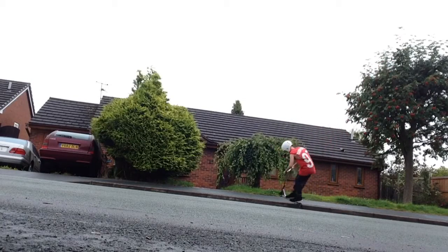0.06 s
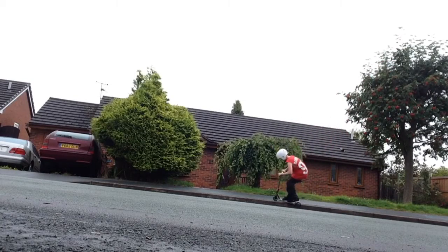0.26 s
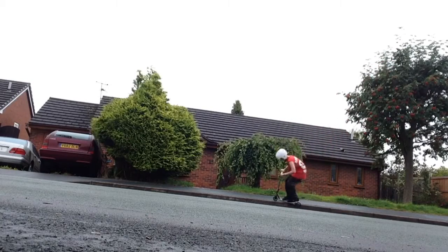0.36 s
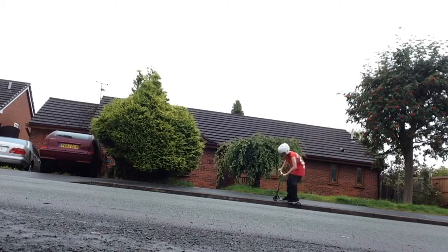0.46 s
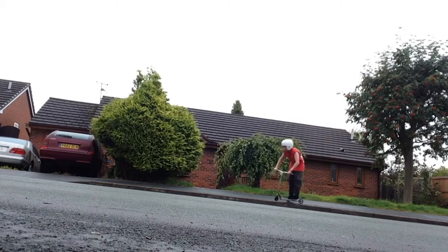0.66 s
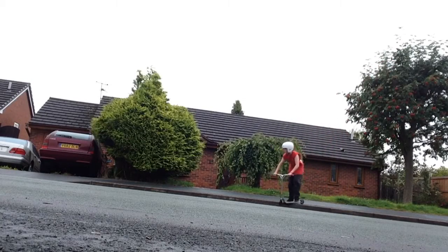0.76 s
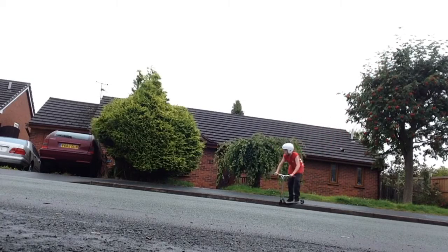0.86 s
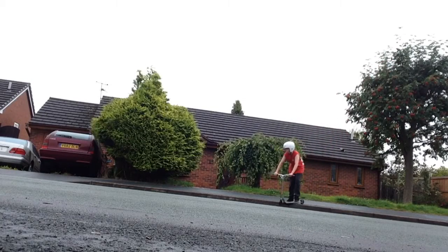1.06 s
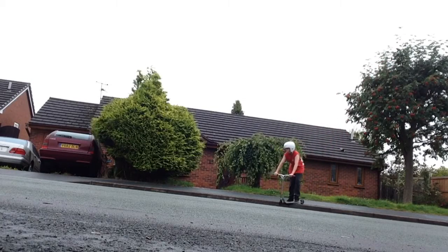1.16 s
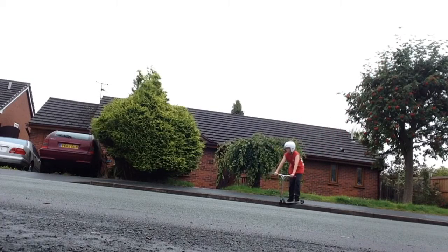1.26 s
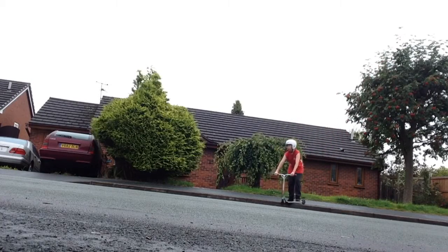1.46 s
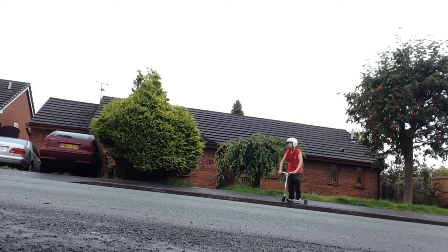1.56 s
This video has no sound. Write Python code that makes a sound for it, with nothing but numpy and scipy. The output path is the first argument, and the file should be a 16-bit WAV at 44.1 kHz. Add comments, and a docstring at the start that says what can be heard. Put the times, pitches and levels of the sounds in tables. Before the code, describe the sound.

Stunt scooter landing on a quiet street: two hard rattly clacks, brief gritty rolling, low distant rumble

```python
"""Two loud clacks among smaller knocks of a small metal stunt scooter on a quiet street, over gritty rolling.
Each knock is a short chatter of contacts that rings the frame, plus a decaying low thud of the deck.
House fronts return a short tail of sparse reflections; the handlebar tube rings on faintly.
Wheel roll and scuff are grit ticks and noise, coloured and levelled over time.
Underneath is the low rumble of the neighbourhood: dark noise with drifting patches."""
import sys
import numpy as np
from scipy import signal
from scipy.fft import rfft, irfft
from scipy.io import wavfile
from scipy.ndimage import uniform_filter1d

SR = 44100
rng = np.random.default_rng(int(sys.argv[2]) if len(sys.argv) > 2 else 0)


def volts_from_decibels(level):
    """Turn decibel levels (scalar or array-like) into linear amplitude factors."""
    exponent = np.asarray(level, float) / 20
    return 10 ** exponent


def waveform_to_disk(signal):
    """Save audio, clipped to [-1, 1], as 16-bit WAV at the path in sys.argv[1]."""
    frames = np.transpose(np.atleast_2d(signal))
    scaled = np.clip(frames, -1, 1) * 32767
    samples = np.round(scaled).astype(np.int16)
    wavfile.write(sys.argv[1], SR, samples)


N = 70560


def evened(x):
    """Scales to rms 1."""
    return x / np.sqrt(np.mean(x ** 2) + 1e-20)


def read(points, hz):
    """Reads a table along log frequency."""
    f, value = np.transpose(points)
    return np.interp(np.log(hz + 1), np.log(f + 1), value)


def add(mix, start_s, sound):
    """Mixes a sound in at start_s."""
    part = mix[round(start_s * SR):][:len(sound)]
    part += sound[:len(part)]


def rumble():
    """Distant traffic and air: dark noise whose spectrum drifts in patches of time and frequency."""
    # spectrum of the rumble: (frequency [Hz], relative density [dB per Hz])
    rumble_colour = [(15, -18), (25, -38), (54, -2), (264, -5), (326, -11), (472, -9.5), (892, -15.5),
                     (1230, -17), (2310, -29.5), (2500, -34), (14000, -67.5)]
    level_db, patchy_db = -45.5, 1.0
    frames, hz = N // 256 + 5, np.fft.rfftfreq(1024, 1 / SR)
    real, imag, patches = rng.standard_normal((frames, 513, 3)).T
    patches = uniform_filter1d(patches, 8, axis=0)  # over bins
    patches = evened(uniform_filter1d(patches, 10, axis=1))  # over frames
    gain_db = read(rumble_colour, hz)[:, None] + patchy_db * patches
    spectra = (real + 1j * imag) * volts_from_decibels(gain_db)
    noise = signal.istft(spectra, nperseg=1024, noverlap=768)[1][:N]
    return volts_from_decibels(level_db) * evened(noise)


def gritty(colour, curve):
    """Hard wheels tick over the grit of the tarmac: random ticks of uneven size in steady noise."""
    ticks_per_s, spread_db, noise_rms = 870, 4, 1.8
    ticks = rng.random(N) < ticks_per_s / SR
    size = volts_from_decibels(spread_db * np.minimum(rng.exponential(1, N), 4))
    grit = evened(ticks * size * rng.choice([-1., 1.], N))
    grit = grit + noise_rms * rng.standard_normal(N)
    gain = volts_from_decibels(read(colour, np.fft.rfftfreq(N, 1 / SR)))
    coloured = evened(irfft(rfft(grit) * gain, N))
    return coloured * volts_from_decibels(np.interp(np.arange(N) / SR, *np.transpose(curve)))


def roll():
    """Rolling wheels: grit noise strongest in the middle band."""
    # rolling loudness: (time [s], rms level [dB])
    roll_curve = [(0, -54), (.07, -57), (.18, -68), (.33, -42.5), (.45, -49.5), (.57, -55.5), (0.701, -58),
                  (0.801, -70), (1.0, -57), (1.15, -65), (1.35, -106), (1.6, -59.5)]
    # rolling spectrum: (frequency [Hz], relative density [dB per Hz])
    roll_colour = [(200, -16.5), (500, -10), (1200, 1), (2500, 1), (3700, -9.5), (5300, -13.5), (7000, -19),
                   (12000, -39.5), (16000, -34)]
    return gritty(roll_colour, roll_curve)


def scuff():
    """Sliding wheel: gritty hiss in the treble."""
    # sliding loudness: (time [s], rms level [dB])
    scuff_curve = [(0, -64), (.035, -56.5), (.06, -69), (.09, -59.5), (.15, -50), (.185, -70), (.21, -62),
                   (.23, -42), (.26, -40), (.32, -46), (.45, -72), (.55, -68.5), (.66, -73), (.75, -80),
                   (.85, -78), (.868, -51), (.93, -61.5), (1.02, -77.5), (1.55, -85.5), (1.6, -77.5)]
    # sliding spectrum: (frequency [Hz], relative density [dB per Hz])
    scuff_colour = [(3000, -14), (5000, 6), (7000, 11), (9500, 7.5), (13000, -9), (16000, -10)]
    return gritty(scuff_colour, scuff_curve)


def street(x):
    """Sparse reflections dying band by band plus a faint far tail; successive instants take different paths."""
    # decay between the house fronts: (frequency [Hz], t60 [s])
    street_t60 = [(200, 0.34), (700, 0.27), (2000, 0.25), (6000, 0.28), (14000, 0.25)]
    level_db, far_t60_s, far_db, path_change_s = -12, 0.39, -22.5, .006
    out, turn = np.zeros(N), np.pi * np.arange(N) / SR / path_change_s
    slots = np.arange(200, SR - 20, 16)  # one reflection per 16 samples
    for path in range(3):
        taps = np.zeros(SR)
        taps[slots + rng.integers(0, 16, len(slots))] = rng.choice([-1., 1.], len(slots))
        hz, t, spectra = signal.stft(taps, SR, nperseg=256)
        near = volts_from_decibels(-60 * t / read(street_t60, hz)[:, None])
        far = volts_from_decibels(far_db - 60 * t / far_t60_s)
        tail = signal.istft(spectra * (near + far), SR, nperseg=256)[1]
        share = np.sqrt(2 / 3) * np.cos(turn + path * np.pi / 3)  # squares of the three sum to 1
        out += signal.fftconvolve(x * share, tail / np.linalg.norm(tail))[:N]
    return volts_from_decibels(level_db) * out


def bar(x):
    """Every knock leaves the handlebar tube ringing faintly: one long decaying mode."""
    hz, level_db, t60_s = 1690, -37.5, 0.59
    t = np.arange(SR // 2) / SR
    ring = volts_from_decibels(-60 * t / t60_s) * np.sin(2 * np.pi * hz * t)
    return volts_from_decibels(level_db) * signal.fftconvolve(x, ring / np.linalg.norm(ring))[:N]


def contact_chatter(length_s, hit, size, sign):
    """A burst of uneven contacts of either sign that swells and fades over its length."""
    contacts_per_s, spread_db, rise_lengths, fade_db = 7000, 6, 0.54, -7
    u = np.arange(len(hit)) / SR / max(length_s, 3e-4)  # time in chatter lengths
    force = volts_from_decibels(-spread_db * np.log(size + 0.057)) * np.sign(sign - .5)
    contacts = (hit < contacts_per_s / SR) * force
    contacts[0] = 1
    return contacts * np.minimum((u + 0.033) / rise_lengths, 1) * volts_from_decibels(fade_db * u ** 2)


def frame_ring(t, nudges):
    """Decaying modes of frame, bars and wheels, slightly detuned by each knock, plus a sharp crack."""
    # modes: (frequency [Hz], level [dB], t60 [s] before the caps below)
    frame_modes = [(800, -2.5, 0.018), (1158, -21.5, 0.072), (1500, -6, 0.016), (1720, 2, 0.013),
                   (1870, -7.5, 0.06), (2178, 7.5, 0.016), (2640, 6, 0.015), (3037, 6, 0.011),
                   (3596, 9.5, 0.006), (4570, 9, 0.0033), (6220, 8.5, 0.0033), (7080, 12, 0.0033),
                   (9210, -10, 0.012), (12500, -17, .003)]
    longest_t60_s, most_cycles, detune, crack_db = .025, 45, .03, -7.5
    ring = np.zeros(len(t))
    for (hz, db, t60_s), nudge in zip(frame_modes, nudges):
        capped_s = min(t60_s, longest_t60_s, most_cycles / hz)
        pitch_hz = hz * (1 + detune * (2 * nudge - 1))
        ring += volts_from_decibels(db - 60 * t / capped_s) * np.sin(2 * np.pi * pitch_hz * t)
    ring = ring / np.linalg.norm(ring)
    ring[1] += volts_from_decibels(crack_db)
    return ring


def colour_db(hz, bright_hz, slope_db):
    """Contact is loudest near one pitch; softer ones dull the treble; the small frame radiates little bass."""
    slope_to_hz, thin_under_hz, top_hz = 6065, 400, 10600
    below_db_per_octave, peak_db, peak_octaves = 1, 4.5, 0.31
    slope = np.log2((1 + (hz / bright_hz) ** 2) / (1 + (hz / slope_to_hz) ** 2)) / 2
    below = np.log2(1 + (bright_hz / (hz + 20)) ** 2) / 2
    edges = (1 + (thin_under_hz / (hz + 20)) ** 4) * (1 + (hz / top_hz) ** 4)
    peak = np.exp(-(np.log2((hz + 20) / bright_hz) / peak_octaves) ** 2)
    return peak_db * peak + slope_db * slope - below_db_per_octave * below - 10 * np.log10(edges)


def deck_thud(t, level_db, thud_hz, thud_db):
    """Deck thuds once: three decaying partials, the lowest growing with the knock level."""
    t60_s, rise_s = .05, .004
    under_db = -5 + .45 * level_db
    thud = np.sin(2 * np.pi * thud_hz * t) + .4 * np.sin(2 * np.pi * thud_hz * 1.24 * t)
    thud = thud + volts_from_decibels(under_db) * np.sin(2 * np.pi * thud_hz * .48 * t)
    return 2 * thud * (1 - np.exp(-t / rise_s)) * volts_from_decibels(thud_db - 60 * t / t60_s)


def knock(level_db, length_s, thud_hz, thud_db, bright_hz, slope_db):
    """A chatter of contacts rings the frame and cracks; the deck thuds once."""
    t = np.arange(4096) / SR
    hit, size, sign = rng.random((3, len(t)))
    contacts = contact_chatter(length_s, hit, size, sign)
    ring = frame_ring(t, size[::-1])
    hz = np.fft.rfftfreq(8192, 1 / SR)
    log_gain = np.log(volts_from_decibels(colour_db(hz, bright_hz, slope_db)))
    mirrored = np.r_[log_gain, log_gain[-2:0:-1]]
    causal = np.exp(np.conj(signal.hilbert(mirrored)))[:len(hz)]  # minimum phase
    chatter = rfft(contacts, 8192)
    chatter = chatter / np.sqrt(uniform_filter1d(abs(chatter) ** 2, size=59))  # no broad colour of its own
    clack = irfft(chatter * rfft(ring, 8192) * causal)[:len(t)]
    clack = clack / np.sqrt(uniform_filter1d(clack ** 2, 176).max())  # loudest 4 ms at rms 1
    return volts_from_decibels(level_db) * (clack + deck_thud(t, level_db, thud_hz, thud_db))


def scene():
    """Scooter knocks with street and bar response, wheels and background."""
    # knocks: (time [s], level [dB], chatter length [s], deck thud [Hz], deck thud [dB re amplitude 2],
    #          brightest pitch [Hz], treble slope [dB per octave])
    knocks = [(0.0778, -28.5, .004, 918, -1, 1100, -20), (0.0878, -26, .007, 800, -12, 1600, -12),
              (0.0938, -33.5, .005, 400, -2.5, 2300, -11), (0.107, -31, 0.0094, 800, -26, 1500, -4.5),
              (0.121, -32, 0.01, 800, -16, 1400, -7.5), (0.14, -38.5, .006, 800, -10.5, 1600, -9.5),
              (0.1515, -35, .007, 800, -14, 3000, -10.5), (0.203, -44, .016, 650, -9.5, 2500, -7.5),
              (0.2295, -9, .009, 573.4, -2.5, 2900, -2), (0.248, -24, .022, 600, -4, 2200, -3),
              (.298, -30, .03, 876, -10, 1802, -4), (0.272, -22.5, .005, 666, 3, 1500, -3),
              (0.2757, -18, .018, 663.6, -5.5, 1900, -3), (0.486, -52.5, .003, 613, -28, 6300, 0.5),
              (.676, -32.5, .005, 661, 7.5, 2200, -6.5), (0.7003, -41, .006, 493, 7, 2200, -4),
              (0.792, -35.5, 0.00054, 800, 0, 1200, -15), (0.8014, -19, 0.014, 627, 3, 2200, -11),
              (0.82, -39, .004, 620, -4, 2800, -12.5), (0.8547, -8, .007, 376.5, -5, 1500, -12),
              (0.866, -19, .007, 400, -9, 1300, -19.5), (0.902, -34.5, .012, 764, 7, 1600, -19),
              (1.506, -57, .006, 697, 7, 2800, -5.5)]
    floor = rumble()
    wheels = roll() + scuff()
    scooter = np.zeros(N)
    for start_s, *settings in knocks:
        add(scooter, start_s, knock(*settings))
    return (scooter + street(scooter) + bar(scooter) + wheels + floor)[None]


def low_pass(x):
    """Removes everything above the highest recorded frequency."""
    return signal.sosfilt(signal.butter(12, 16290, fs=SR, output="sos"), x)


def record(dry):
    """Overload clips, the microphone housing cuts a narrow dip, and both band edges roll off or stop."""
    notch_hz, notch_width_hz, notch_db = 8100, 200, -8
    low_cut_hz, edge_hz = 36, 16200
    hz = np.fft.rfftfreq(N, 1 / SR)
    dip = volts_from_decibels(notch_db / (1 + ((hz - notch_hz) / notch_width_hz) ** 2))
    band = (hz < edge_hz) / np.sqrt(1 + (low_cut_hz / (hz + 1)) ** 6)
    clipped = np.clip(dry, -.93, .93)
    mix = irfft(rfft(clipped) * dip * band, N)
    return low_pass(mix)


dry = scene()
out = record(dry)
waveform_to_disk(out)
```